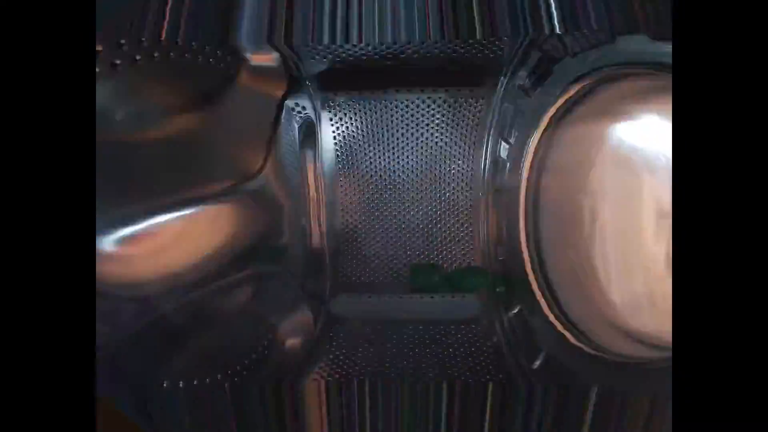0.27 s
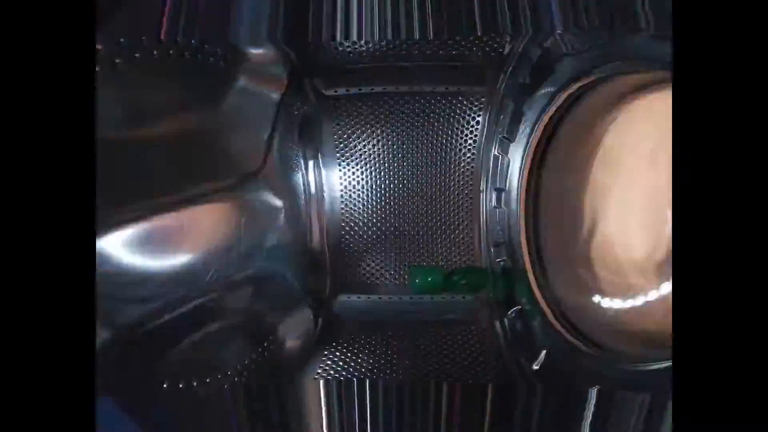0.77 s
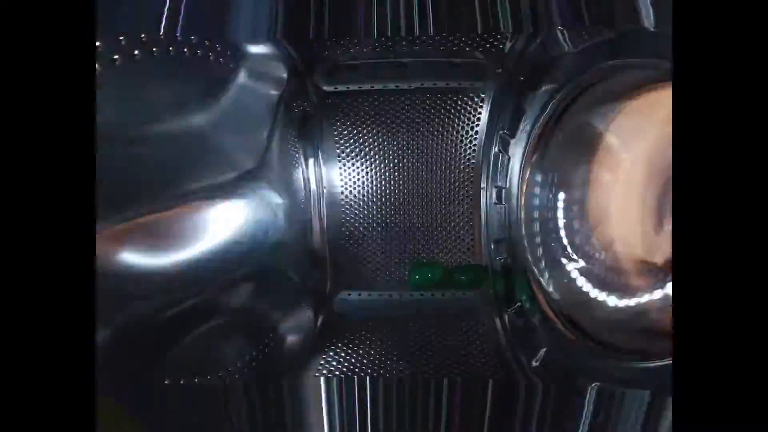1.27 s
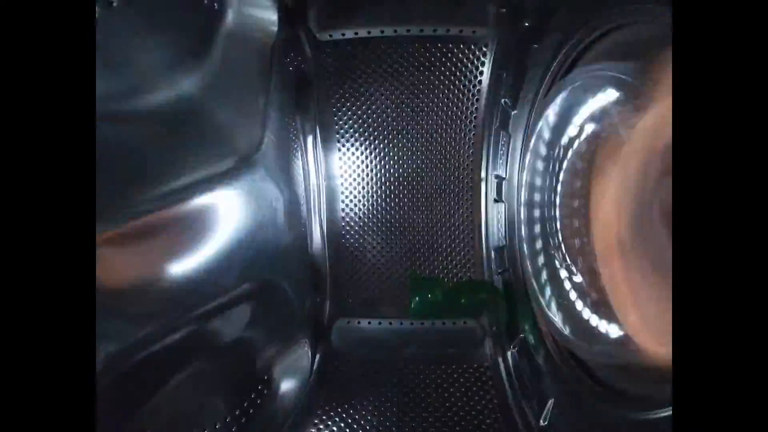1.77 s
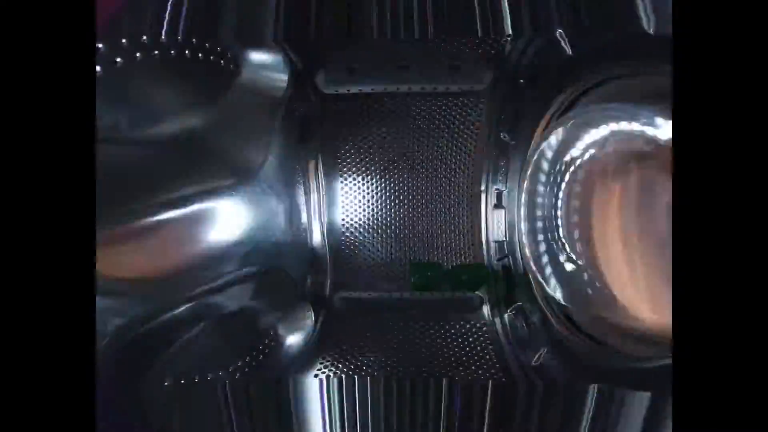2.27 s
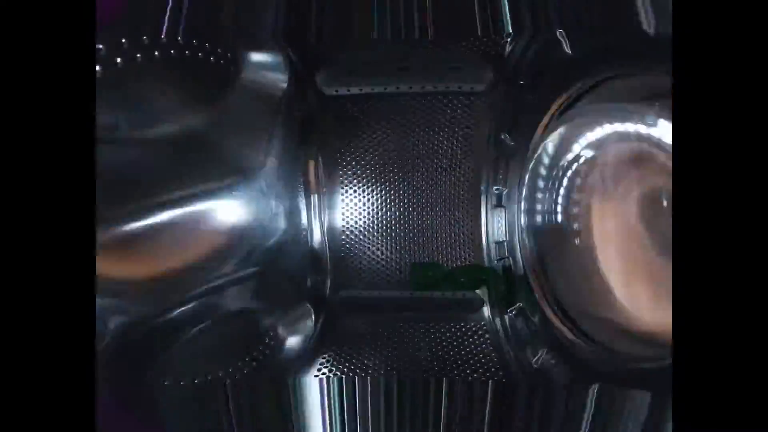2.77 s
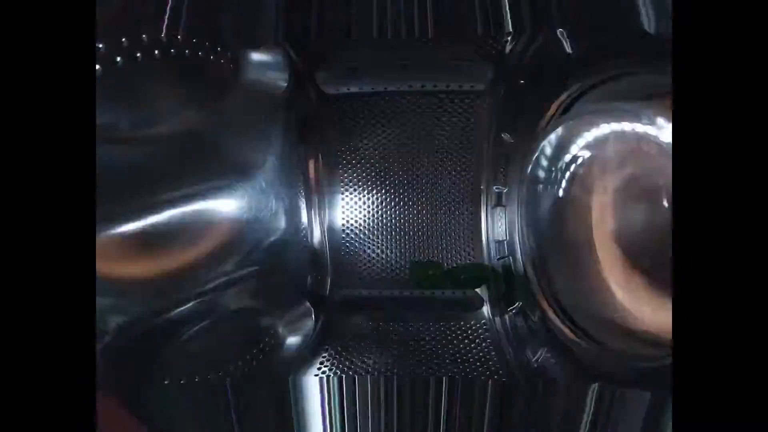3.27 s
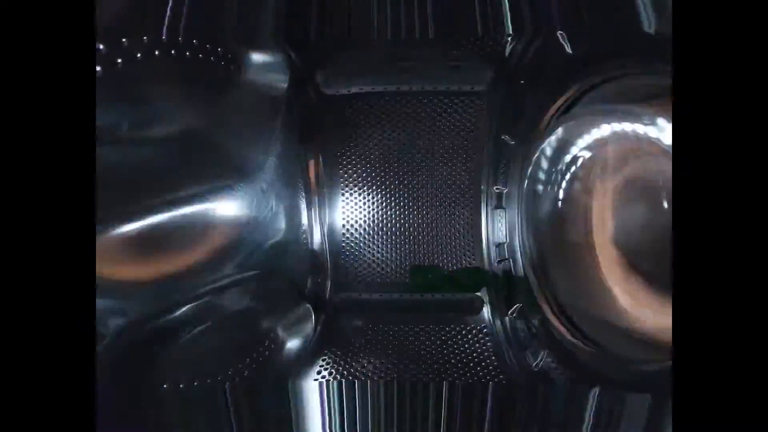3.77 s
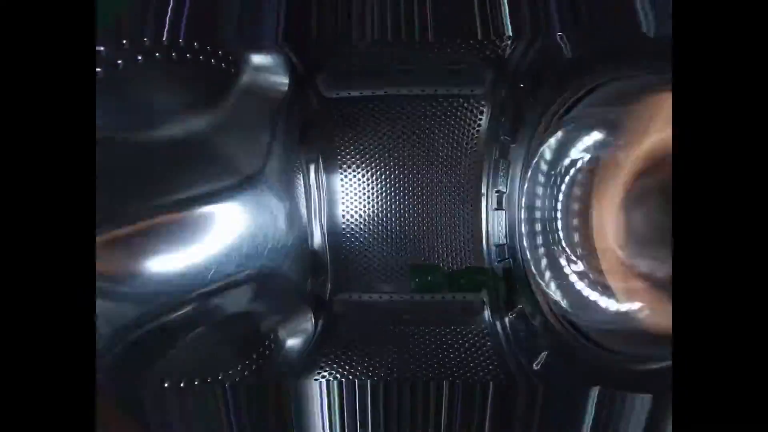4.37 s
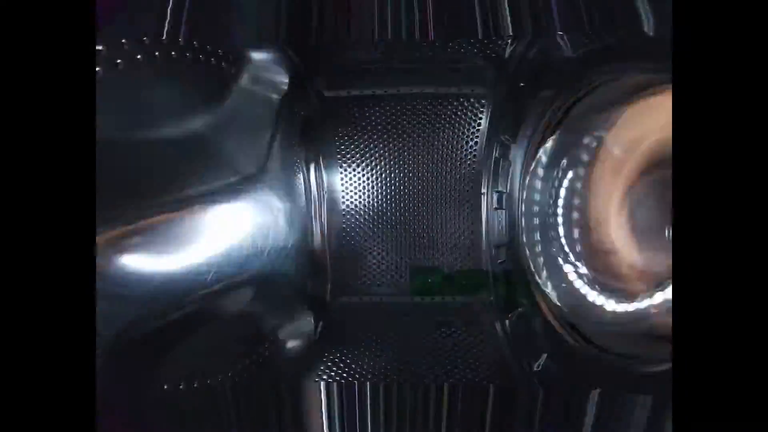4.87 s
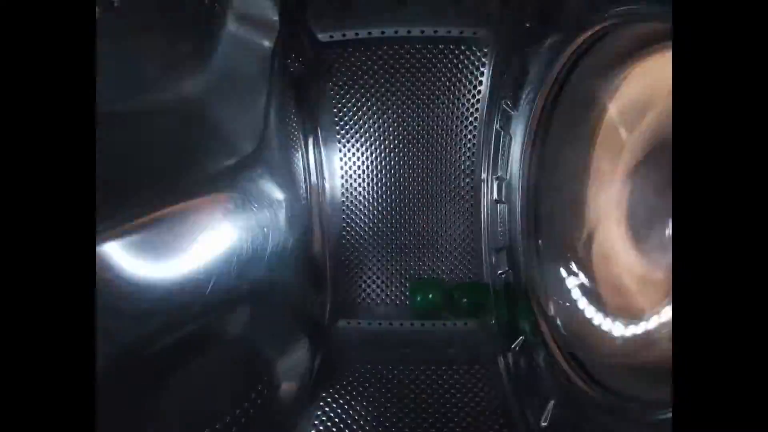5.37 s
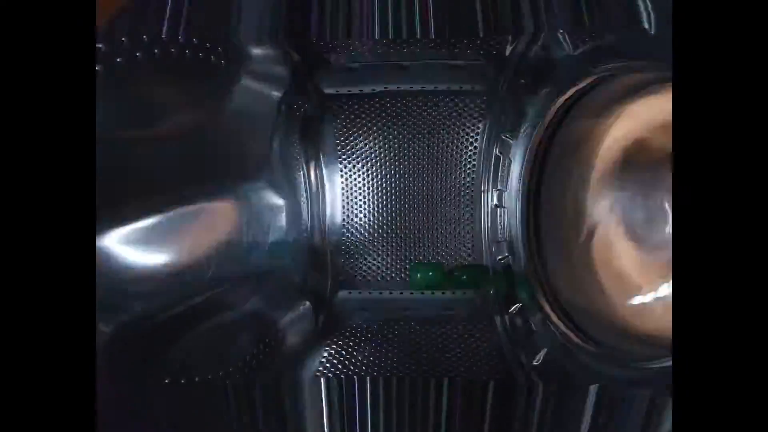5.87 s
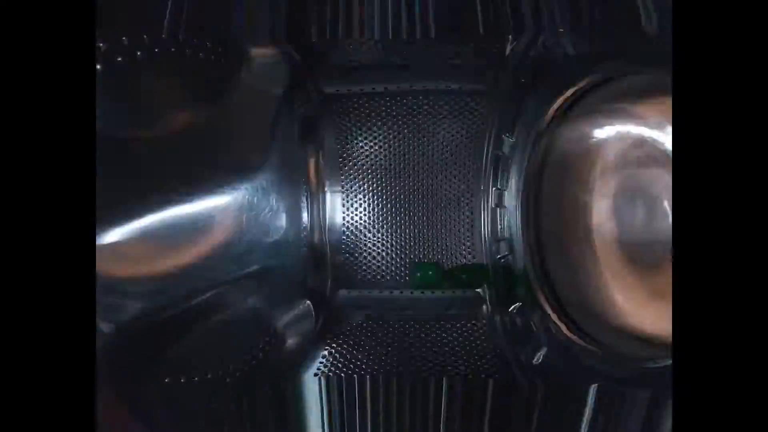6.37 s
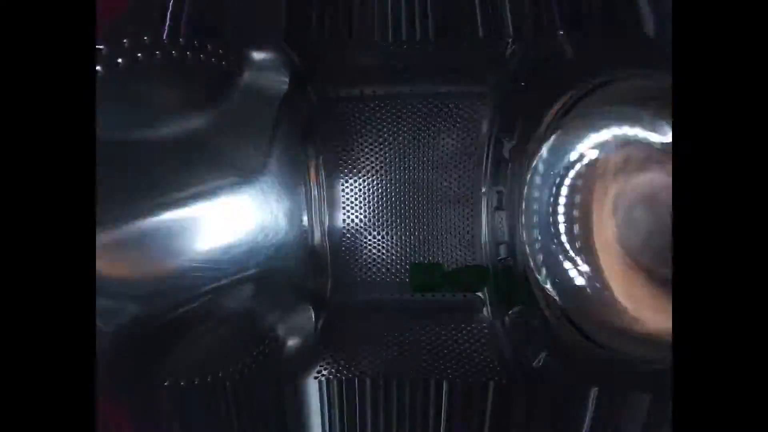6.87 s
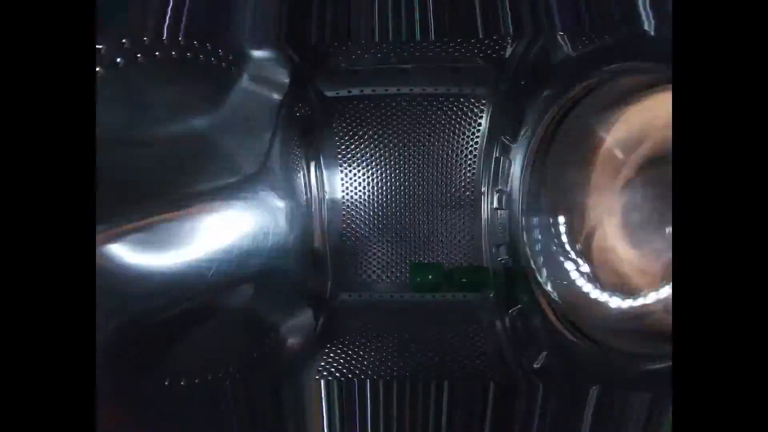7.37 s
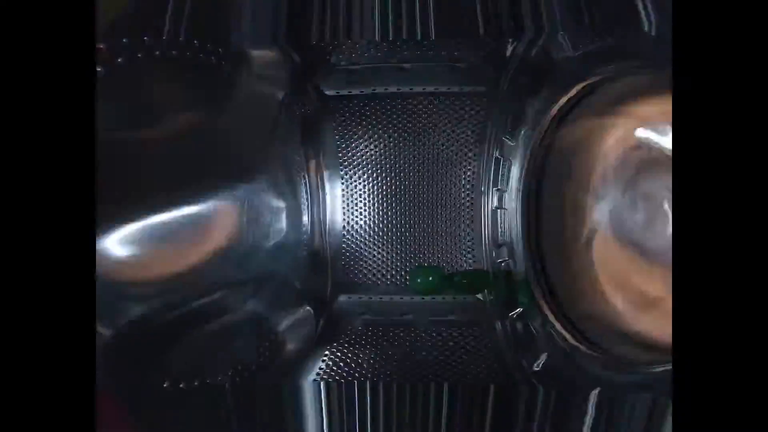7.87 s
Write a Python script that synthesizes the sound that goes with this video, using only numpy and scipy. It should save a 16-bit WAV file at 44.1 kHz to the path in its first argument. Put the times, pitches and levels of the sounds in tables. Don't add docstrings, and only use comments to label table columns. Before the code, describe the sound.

Heard from a small microphone riding on the wall of a washing machine drum, a fast spin is already under way. A hollow mid-low drone flutters about twelve times a second within a broad airy whir. Deep wind rumble and soft thuds buffet the microphone irregularly. A faint, wavering high motor whine sits behind. Pitch climbs slightly, and the air grows thicker toward the end.

```python
import sys
import numpy as np
from scipy import signal
from scipy.fft import next_fast_len
from scipy.io import wavfile
from scipy.ndimage import uniform_filter1d

SR = 44100
rng = np.random.default_rng(int(sys.argv[2]) if len(sys.argv) > 2 else 0)


def to_wav(sig):
    pcm = np.clip(np.atleast_2d(sig), -1, 1) * 32767
    pcm = np.round(pcm).astype(np.int16)
    wavfile.write(sys.argv[1], SR, pcm.T)


def to_linear_factor(level_db):
    exponent = np.asarray(level_db, float) / 20
    return 10 ** exponent


N = 357651
T = np.arange(N) / SR


def evened(x):
    return x / np.sqrt(np.mean(abs(x) ** 2) + 1e-20)


def curve(rows):
    seconds, *columns = np.transpose(rows)
    return [np.interp(T, seconds, column) for column in columns]


def bumps(at, db, half):
    t = T[::100]
    heights = db * np.exp(-((t[:, None] - at) / half) ** 2)
    return np.interp(T, t, heights.sum(axis=1))


def drift(hz):
    a, b = rng.standard_normal((2, next_fast_len(N)))
    slowing = 1 + (np.fft.fftfreq(len(a), 1 / SR) / hz) ** 2
    return evened(np.fft.ifft((a + 1j * b) / slowing)[:N])


def noise(spectrum, patch_db, flicker_db, size):
    hop = size // 4
    f = np.fft.rfftfreq(size, 1 / SR)
    frames = N // hop + 5
    a, b, patches = rng.standard_normal((frames, len(f), 3)).T
    patches = uniform_filter1d(patches, size=10, axis=0)
    patches = evened(uniform_filter1d(patches, size=8, axis=1))
    flicker = evened(uniform_filter1d(rng.standard_normal(frames), size=3))
    hz, db = np.transpose(spectrum)
    colour_db = np.interp(np.log(f + 1), np.log(hz + 1), db, right=-100)
    z = (a + 1j * b) * to_linear_factor(colour_db[:, None] + patch_db * patches + flicker_db * flicker)
    return evened(signal.istft(z, nperseg=size, noverlap=size - hop)[1][:N])


# time in seconds, speed in turns a second.
DRUM_SPEED = [
    (0, 11.41),
    (4, 12.057),
    (8.11, 12.716),
]


def spin():
    speed, = curve(DRUM_SPEED)
    return speed, np.cumsum(speed) / SR


# time in seconds, then changes in dB of the turbulence in
STIRRING = [
    (0, 1.5, -1.5, 1),
    (1.5, 0, -0.5, 0),
    (3, -0.5, -1.5, 0),
    (4.5, 0, -2.5, -0.5),
    (5.4, 2, -2.5, 1),
    (5.9, -2, 0, -1),
    (7, -5, 2., -1),
    (8.11, -3.5, 3., -1.),
]


def stirring():
    return curve(STIRRING)


# time in seconds, change in dB, half length in seconds.
LOAD_SHIFTS = [(.07, 1.5, .05), (.33, -1.5, 0.077), (.58, 3, 0.045), (1.12, -2, .04), (1.62, 2.5, 0.081),
               (1.84, -5.5, 0.027), (2.2, -2, 0.051), (2.43, 2, 0.029), (2.78, -4, 0.048),
               (3.66, -11.5, .03), (3.86, -5, .025), (4.28, -3, 0.023), (4.37, 1, 0.036), (5.1, 0, .06),
               (6.15, 2, .05), (6.38, -3, .06), (7.16, 3.5, 0.026), (7.27, -5, 0.033)]


def load_shifts():
    return bumps(*np.transpose(LOAD_SHIFTS))


# multiple of the drum speed,
# pitch where loudest in Hz, half width of the swell in Hz, top level in dB.
LOW_TONES = [(6.001, 78, 8, -38.8), (9.001, 112, 11, -39.1), (10.002, 125, 8, -41.3),
             (11.946, 147, 27, -37.1), (18.002, 234, 41, -45.8), (19.002, 231, 13, -44.3),
             (20.659, 250, 13, -45.4), (21.662, 241, 89, -39.1), (21.998, 267, 15, -43.2),
             (25.099, 292, 62, -43.9), (26.097, 290, 55, -39.0), (27.077, 341, 16, -35.8),
             (27.676, 344, 11, -39.4), (28.075, 345, 32, -43.1), (29.678, 376, 15, -27.0),
             (29.933, 363, 14, -27.8), (30.482, 370, 13, -24.0), (31.264, 367, 20, -27.4),
             (31.937, 385, 28, -28.4), (32.266, 391, 39, -30.8), (32.487, 392, 23, -19.6),
             (33.268, 394, 20, -26.4), (33.479, 395, 22, -30.6), (36.855, 460, 100, -46.2),
             (38.44, 480, 100, -47.5)]
# multiple of the drum speed,
# pitch where loudest in Hz, half width of the swell in Hz, top level in dB.
HIGH_TONES = [(46.731, 580, 44, -44.8), (47.735, 589, 67, -43.5), (48.77, 591, 100, -40.1),
              (50.141, 624, 21, -35.7), (51.139, 628, 25, -37.0), (52.14, 634, 34, -38.5),
              (54.149, 688, 40, -28.5), (54.423, 606, 100, -36.5), (54.781, 654, 79, -38.0),
              (55.15, 662, 100, -38.0), (56.36, 704, 16, -31.0), (58.567, 713, 63, -40.4),
              (59.562, 724, 38, -28.0), (60.561, 722, 48, -36.6), (75.776, 899, 23, -34.7),
              (76.298, 900, 63, -40.8), (76.8, 913, 34, -37.1), (77.714, 865, 86, -35.4),
              (80.226, 986, 57, -41.8), (81.221, 999, 41, -37.0), (81.454, 1002, 48, -40.8),
              (86.649, 964, 85, -34.2)]


def hum(speed, turns, level_db):
    step, waver = 200, .16
    out = np.zeros(N)
    for order, top_hz, half_hz, db in LOW_TONES + HIGH_TONES:
        past = (order * speed[::step] - top_hz) / half_hz
        swell = 1 / (1 + np.where(past > 0, 2 * past, past) ** 2)
        shake = uniform_filter1d(rng.standard_normal((2, len(swell))), size=40, axis=1)
        level = swell * (1 + waver * evened(shake[0]))
        slip = rng.random() + waver / (2 * np.pi) * evened(shake[1])
        phase = order * turns + np.interp(T, T[::step], slip)
        level = np.interp(T, T[::step], level)
        out += to_linear_factor(db) * np.sqrt(2) * level * np.cos(2 * np.pi * phase)
    return to_linear_factor(level_db) * out


# pitch in Hz, width in Hz, level in dB, number of pressure waves around the rim.
AIR_MODES = [(381.2, 32, -22.5, 1), (600, 65, -32.5, 1), (631.4, 36, -35, 0), (709.3, 50, -26.5, 0),
             (865.6, 60, -33, 1), (901, 54, -35, 0), (981, 18, -38.5, 0), (276, 55, -37, 0),
             (1324, 33, -42, 0), (1555, 73, -38, 0), (1723, 39, -41.5, 0), (1869, 70, -40.5, 0)]


def tub_air(turns, first_db, upper_db):
    out = np.zeros(N)
    for k, (hz, width, db, lobes) in enumerate(AIR_MODES):
        sweep = 1
        if lobes > 0:
            sweep = np.sqrt(2) * np.cos(2 * np.pi * (lobes * turns + rng.random()))
        ring = np.sqrt(2) * (drift(width / 2) * np.exp(2j * np.pi * hz * T)).real
        stir_db = first_db if k == 0 else upper_db
        out += to_linear_factor(db + stir_db) * ring * sweep
    return out


# time in seconds, change in dB.
TURBULENCE = [
    (0, -0.5),
    (1.5, 0.5),
    (2.5, -1),
    (4, -1.5),
    (5.3, -1),
    (5.8, 0.5),
    (6.5, 1.5),
    (8.11, 2.5),
]


def turbulence():
    return curve(TURBULENCE)[0]


# time in seconds, change in dB, half length in seconds.
AIR_SURGES = [(0.572, -1.5, 0.054), (0.922, -2, .05), (1.167, 2, 0.019), (1.92, -0.5, 0.065),
              (2.3, 2.5, .02), (2.333, -3.5, 0.025), (2.672, -4.5, 0.015), (2.73, 1.5, .03),
              (2.927, 2, 0.035), (3.118, 1.5, 0.011), (3.24, 3, 0.027), (3.688, 3, 0.03),
              (3.862, 2.5, 0.037), (4.135, -1, 0.014), (4.172, 1.5, 0.021), (4.303, 3, 0.023),
              (4.365, -3, 0.018), (4.604, 2, 0.022), (4.987, -1, 0.011), (5.304, 4, .03), (6.38, 1, 0.11),
              (6.598, -2.5, 0.044), (7.013, 0.5, .04), (7.23, 0, .04)]


def air_surges():
    return bumps(*np.transpose(AIR_SURGES)) + 0.53 * evened(drift(5.0).real)


# pitch in Hz, level in dB per Hz.
WHIR_COLOUR = [(100, -12.5), (220, -5), (500, -2.5), (800, 2), (1400, -1.5), (1900, -9), (2700, -14),
               (3100, -20), (4000, -26), (4500, -35.5), (5800, -35), (7000, -48.5), (9300, -55),
               (14200, -68)]


def whir(flow_db, swell_db, wake):
    level_db = -23.5 + flow_db + swell_db + 0.36 * np.cos(2 * wake)
    return to_linear_factor(level_db) * noise(WHIR_COLOUR, patch_db=0.77, flicker_db=1.44, size=1024)


# time in seconds, change in dB.
SLACK_MOMENTS = [(.31, -3), (.52, -10), (.86, -9), (1.36, -3), (2.01, -7), (3.5, -5), (4.22, -11),
                 (4.95, -9.5), (5.1, -2), (5.26, -5), (5.56, -5), (6.57, -9)]


def slackening():
    return bumps(*np.transpose(SLACK_MOMENTS), half=.04)


# pitch in Hz, level in dB per Hz.
PUSH_COLOUR = [(4, -24), (12, -5.5), (22, 1), (40, -3.5), (60, -12), (120, -30)]
# time in seconds, change in dB.
LARGE_EDDIES = [(.05, 3), (.6, 3.5), (.81, 7.5), (1.05, 1), (1.5, 3), (2.1, 5), (2.6, 8.5), (4.02, 4.5),
                (5.02, 2), (5.2, 3), (5.37, 3), (5.7, 4), (6.5, 3.5), (6.7, 3), (7.02, 3.5), (7.55, 4),
                (8.07, 4.5)]


def push(flow_db, calm_db, lump_db):
    eddy_db = bumps(*np.transpose(LARGE_EDDIES), half=0.058)
    level_db = -25.5 + 1.2 * flow_db + eddy_db + calm_db + 0.67 * lump_db
    return to_linear_factor(level_db) * noise(PUSH_COLOUR, patch_db=0.85, flicker_db=.5, size=2048)


# pitch in Hz, level in dB per Hz.
THUD_COLOUR = [(25, -20), (50, -2.5), (75, -1), (150, -5), (250, -13), (600, -34.5)]
# time in seconds, change in dB.
SMALL_EDDIES = [(.08, 5.5), (.6, 5), (.81, 7), (1.04, 10.5), (1.4, 1), (1.93, 9), (2.05, 9), (2.7, 8),
                (2.76, 5), (3.34, 9.5), (4.27, 9), (4.34, 8), (4.78, 8), (5.36, 9), (5.72, 6.5), (5.81, 12),
                (6.38, 4), (6.95, 6), (7.18, 8.5), (7.25, 4.5), (7.55, 4), (7.75, 5), (7.95, 10),
                (8.07, 11)]


def thuds(flow_db, calm_db, lump_db, wake):
    eddy_db = bumps(*np.transpose(SMALL_EDDIES), half=.025)
    level_db = -32.5 + 0.97 * flow_db + eddy_db + 0.37 * calm_db + lump_db
    level_db += 2.5 * np.cos(wake) + 1 * np.cos(2 * wake)
    return to_linear_factor(level_db) * noise(THUD_COLOUR, patch_db=-0.3, flicker_db=2.0, size=1024)


ECHO_PATHS = [1, .97, 1, .96, .98, .9, 1, .8, .97, .62, .98, .45, .94, .99, 1, .2]


def whine(speed, turns, count, rough_hz, direct):
    bars_per_turn = 36 * 11.946
    doppler = .046
    out = np.zeros(N)
    for k, share in enumerate(ECHO_PATHS):
        angle = 2 * np.pi * (turns + .33 + .382 * k)
        path = doppler * share / (2 * np.pi) * speed / speed[0] * np.sin(angle)
        spark = 1 + .5 * drift(rough_hz)
        strength = direct * np.cos(angle) ** 2 if k == 0 else 1
        out += strength * (spark * np.exp(2j * np.pi * count * bars_per_turn * (turns + path))).real
    return evened(out)


def motor(speed, turns, swell_db):
    base = to_linear_factor(-55.7 + .9 * swell_db) * whine(speed, turns, count=1, rough_hz=28, direct=5)
    sag_db = -4 * (speed - speed[0])
    shut_db = -10.5 / (1 + np.exp((12.4 - speed) / .08))
    over_db = -71.5 + sag_db + shut_db + .7 * swell_db
    return base + to_linear_factor(over_db) * whine(speed, turns, count=2, rough_hz=78.7, direct=2)


def scene():
    speed, turns = spin()
    first_db, upper_db, tones_db = stirring()
    choke_db = load_shifts()
    flow_db = turbulence()
    swell_db = air_surges()
    calm_db = slackening()
    lump_db = 1.45 * evened(drift(8.1).real)
    wake = 2 * np.pi * (turns - 0.07)
    out = hum(speed, turns, tones_db + choke_db)
    out += tub_air(turns, first_db + choke_db, upper_db + 0.59 * swell_db)
    out += whir(flow_db, swell_db, wake)
    out += push(flow_db, calm_db, lump_db)
    out += thuds(flow_db, calm_db, lump_db, wake)
    out += motor(speed, turns, swell_db)
    return out[None]


def band_limit(x):
    return signal.sosfilt(signal.butter(12, 14170, fs=SR, output="sos"), x)


def record(dry):
    power = uniform_filter1d(uniform_filter1d(dry ** 2, size=900), size=900)
    power_db = 10 * np.log10(power + 1e-9)
    ridden = dry / to_linear_factor(0.28 * (power_db + 13.0))
    return band_limit(ridden)


dry = scene()
out = record(dry)
to_wav(out)
```